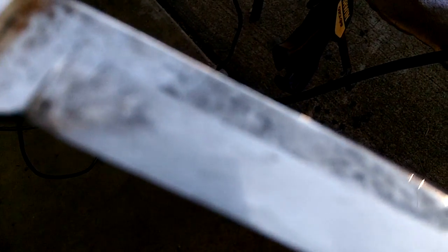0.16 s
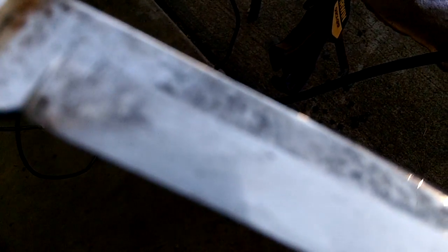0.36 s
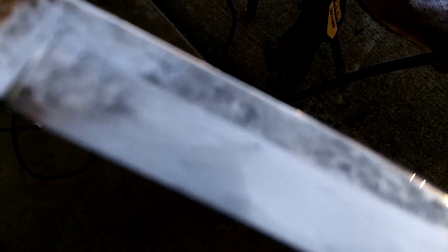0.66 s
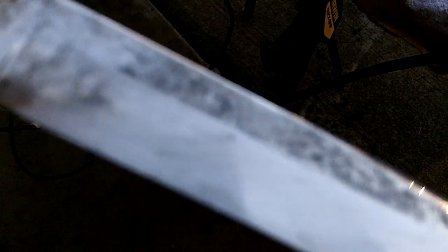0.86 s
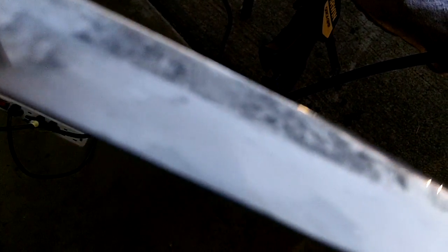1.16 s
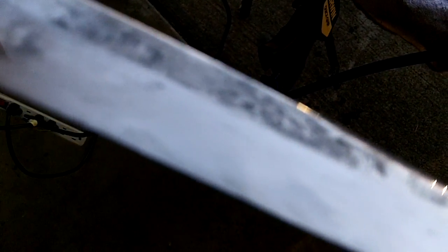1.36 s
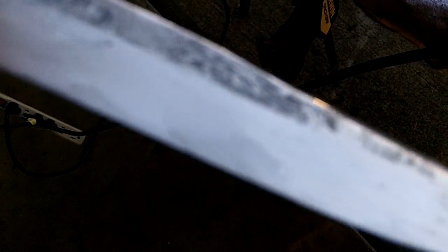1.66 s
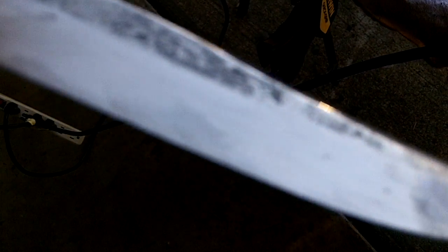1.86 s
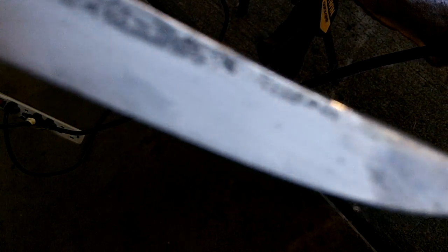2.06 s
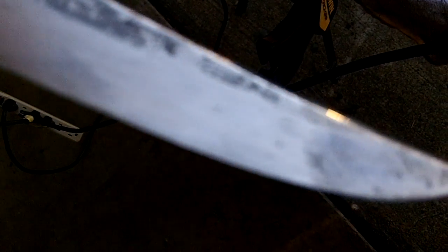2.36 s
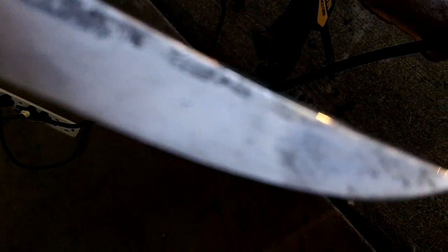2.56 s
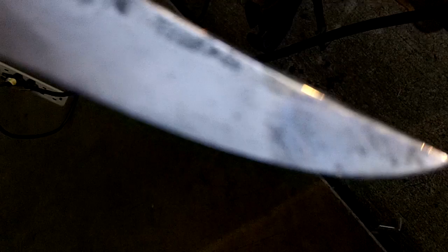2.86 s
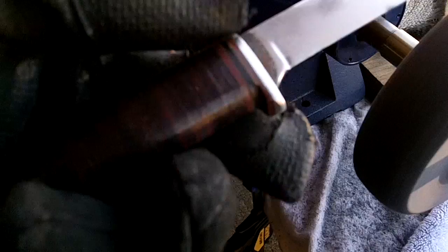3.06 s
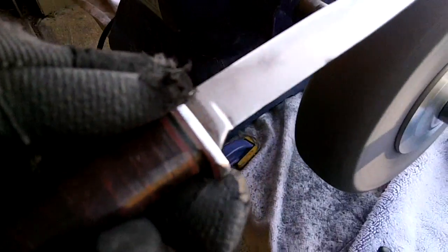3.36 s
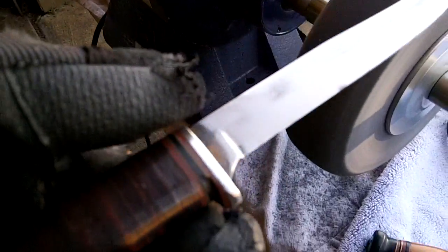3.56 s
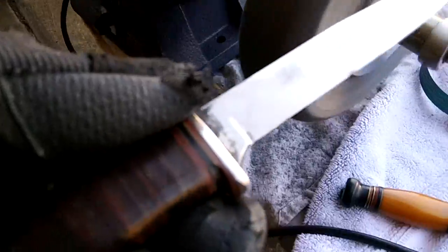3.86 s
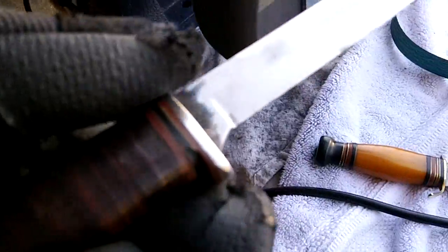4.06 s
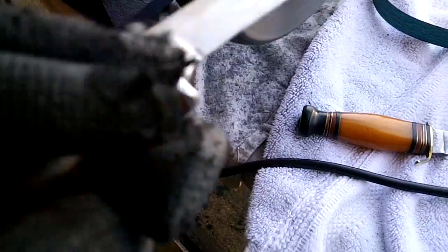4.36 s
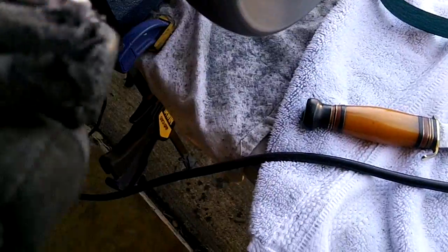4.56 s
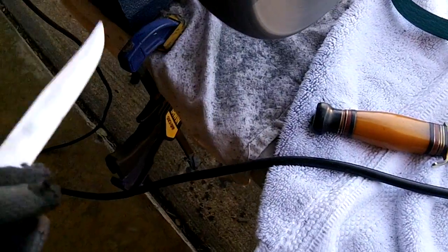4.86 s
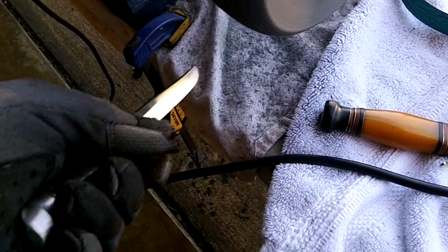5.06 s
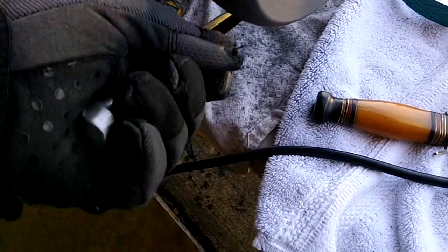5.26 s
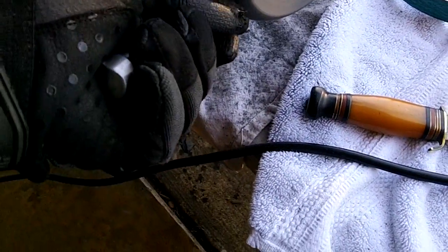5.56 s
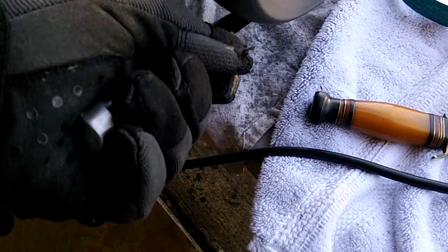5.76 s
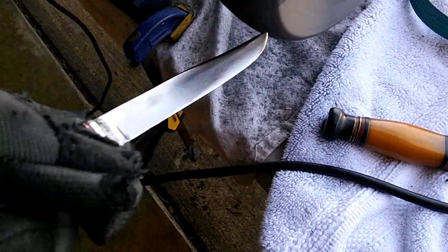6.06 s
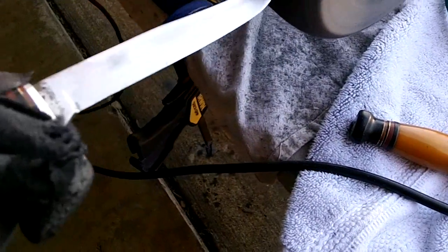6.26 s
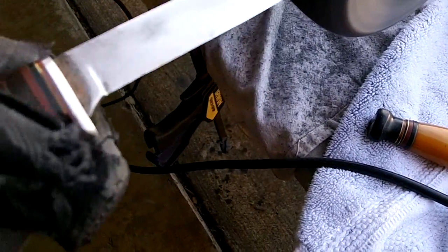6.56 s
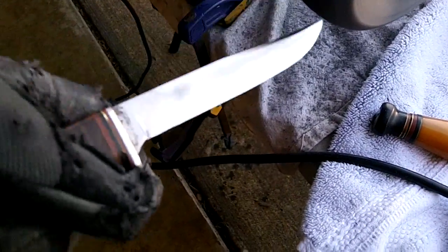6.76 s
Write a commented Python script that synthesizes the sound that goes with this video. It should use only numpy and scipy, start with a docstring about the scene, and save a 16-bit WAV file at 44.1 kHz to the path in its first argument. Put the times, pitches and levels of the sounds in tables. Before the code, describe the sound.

Quiet rising bird calls and a click give way to a steadily whining buffer motor, with one short, harsh stroke of steel on the wheel.

```python
"""Outdoors, a bird flicks out rising calls over far twitter, traffic and a faint rumble. A gloved hand
rustles on a knife, and a button click rings the camera's plastic shell. After a short silent cut a
bench buffer is running: shaft tones, magnetic hum and whine, air dragged by the wheel and a bearing
that squeals once, while the bird calls a little longer. Then the hand shades the motor and draws the
blade along the abrasive wheel to its tip, rasping on the high spots of each turn, and lifts it off."""
import sys
import numpy as np
from scipy import signal
from scipy.fft import rfft, irfft, next_fast_len
from scipy.io import wavfile
from scipy.ndimage import uniform_filter1d, map_coordinates

SR = 44100
rng = np.random.default_rng(int(sys.argv[2]) if len(sys.argv) > 2 else 0)


def wav_out(sig):
    """Save sig, one row per channel (or a flat mono array), as 16-bit PCM at SR to the path in sys.argv[1]."""
    wavfile.write(sys.argv[1], SR, np.round(np.clip(np.atleast_2d(sig).T, -1, 1) * 32767).astype(np.int16))


N = 304907
T = np.arange(N) / SR
CUT_START_S, CUT_END_S = 3.079, 3.148
MAINS_HZ, FREE_TURNS_PER_S = 60, 29.862
TOUCH_S, TIP_S, LIFT_S, CLEAR_S = 5.377, 6.0, 6.11, 6.155  # cues of the blade's stroke
MAGNETIC_SHADE_DB = -8.5  # how far the hand ducks the upper hum and the whine's sidebands

# Table levels are relative: each layer adds its own trims and envelopes.
# blade's bending modes (mid-blade pitch [Hz], tip pitch [Hz], width [Hz], mid level [dB], tip level [dB])
BLADE_MODES = [(920, 910, 56, -9.5, -7), (1764, 1562, 66, 8, 9), (2132, 2560, 85, 9.5, -3),
               (2404, 2630, 250, 0.5, 4.5), (3480, 3380, 265, -10.5, 7.5), (4570, 4640, 160, -33, 1),
               (5960, 5600, 110, -46, 0.5)]
# grit scraping on steel (frequency [Hz], level [dB])
GRIT_EQ = [(200, -24), (700, -7), (1300, 0), (2200, 3), (3000, 0.5), (4200, -0.5), (5000, -11), (5600, -28),
           (6800, -37), (7600, -48.5), (11000, -29.5), (13000, -64)]
# sizzle of the thin tip (frequency [Hz], level [dB])
SIZZLE_EQ = [(4000, -20), (7000, -8), (9000, 12), (11000, 7), (13500, -5), (15000, -16)]
# high spots on the wheel's rim (position [turns], width [turns], level [dB])
HIGH_SPOTS = [(.97, .05, 0), (.3, .06, -4), (.5, .04, -2), (.78, .06, -3)]
# the edge catches on the wheel (time [s], gain [dB])
EDGE_BITES = [(5.488, -1), (5.519, 7.5), (6.004, 7), (6.037, 6), (6.073, 5.5), (6.104, 3)]
# the hand's effort (time [s], pressure [dB], harshness [dB])
HAND_EFFORT = [(5.39, -34, -3.5), (5.396, -34, -5), (5.458, -30, -6), (5.616, -34.5, 2.5),
               (5.726, -33, 2.5), (5.812, -36.5, -7.5), (5.918, -37.5, -12), (6.03, -33.5, -0.5),
               (6.11, -35.5, 1)]
# tones of unbalance and bearings (shaft order [number], level [dB])
SHAFT_ORDERS = [(1, -50.5), (2, -57), (3, -50.5), (4, -72), (6, -57), (8, -57.5), (10, -55), (11, -55),
                (13, -58.5), (15, -54.5), (16, -62), (19, -62.5), (21, -59.5), (23, -64.5), (26, -62),
                (31, -66), (35, -86)]
# fader ride of the fifth shaft order (time [s], level [dB])
FIFTH_RIDE = [(3.2, -57), (3.73, -47.5), (4.53, -66), (4.88, -50.5), (5.34, -48), (5.69, -62.5),
              (6.19, -48), (6.9, -63.5)]
# fader ride of the low hum (time [s], level [dB])
LOW_HUM_RIDE = [(3.2, -47), (3.59, -47), (4.08, -53), (4.58, -44.5), (5.09, -46.5), (5.44, -52.5),
                (6.7, -58.5)]
# upper magnetic hum (frequency [multiples of the mains], level [dB])
HUM_PARTIALS = [(4, -60), (6, -58.5), (7, -57), (10, -54)]
# rotor bar whine and its sidebands (offset [multiples of the mains], level [dB])
WHINE_PARTIALS = [(-4, -57), (-2, -46.5), (0, -44), (4, -54.5), (8, -61.5), (10, -55.5), (12, -58),
                  (14, -75.5), (25, -63)]
# air dragged round by the wheel (frequency [Hz], level [dB])
RUSH_EQ = [(20, 19), (70, -5.5), (190, 7), (330, 0), (560, 3), (870, 0.5), (1100, -2.5), (2000, -2),
           (2750, -2), (3150, 0.5), (3900, -7.5), (4450, -7), (5000, -13), (7200, -22.5), (9000, -27.5),
           (14500, -32.5)]
# near bird's calls (time of the top [s], lead-in [s], knee pitch [Hz], top pitch [Hz], level [dB])
BIRD_CALLS = [(.763, 0.16, 2870, 3580, -67), (1.417, 0.22, 2900, 3550, -62.5),
              (1.893, 0.095, 2250, 3680, -61), (2.247, 0.086, 2280, 3750, -63),
              (2.592, 0.08, 2280, 3720, -59), (2.852, 0.093, 2350, 3610, -60),
              (3.118, .097, 2320, 3650, -59), (3.735, .078, 2300, 3700, -53),
              (4.24, 0.084, 2250, 3650, -50)]
# slapback off the walls (delay [s], level [dB])
WALL_ECHOES = [(.019, -9.5), (.043, -13), (.085, -25), (.13, -27)]
# handling and button clicks (time [s], peak level [dB], contact time [s])
CAMERA_CLICKS = [(2.681, -60, .004), (2.953, -31, 0.00071), (2.957, -20, 0.0008), (2.983, -49, .002)]
# modes of the camera's shell (pitch [Hz], level [dB], decay by 60 dB [s])
SHELL_MODES = [(170, -6, 0.015), (900, -12, 0.028), (1440, -8.5, 0.011), (2110, -3, 0.0033),
               (2920, -1, 0.011), (3150, 6, 0.0055), (4180, -3.5, 0.013), (5800, -29, .006)]
# the glove slides on the knife (peak time [s], build-up [s], level [dB])
GLOVE_SLIDES = [(1.98, .09, -74), (2.5, 0.42, -73), (2.61, 0.069, -65.5), (2.685, 0.048, -62.5),
                (2.935, 0.12, -64.5), (3.03, 0.073, -73)]
# the glove's rustle (frequency [Hz], level [dB])
GLOVE_EQ = [(1200, -19), (2300, -11), (3100, -0.5), (3900, -11), (5500, -15.5), (7000, -30), (10000, -41)]
# the hand jogs the camera (time [s], length [s], level [dB])
CAMERA_JOGS = [(0.377, 0.13, -61), (1.735, 0.25, -54), (2.05, 0.33, -56.5), (2.55, 0.54, -62),
               (2.977, 0.13, -54)]
# rumble of those jogs (frequency [Hz], level [dB])
JOG_EQ = [(10, -9), (25, 0.5), (50, -3.5), (90, -15.5), (200, -26.5), (800, -66)]
# a farther bird's falling chips (time [s], start pitch [Hz], level [dB])
FAR_CHIPS = [(.05, 3150, -71), (.105, 3200, -67), (1.375, 4250, -71), (1.43, 4250, -75), (1.6, 4700, -76),
             (1.72, 3850, -74), (1.95, 4500, -73), (2.04, 3400, -70), (2.11, 3050, -69.5)]
# distant vehicles (time [s], length [s], roar pitch [Hz], roar level [dB], tyre level [dB])
PASS_BYS = [(.8, 1, 520, -67, -75.5), (2.055, 0.67, 450, -68.5, -69), (2.85, 0.78, 545, -72, -69.5)]
# a far engine's two beating tones (pitch [Hz], level [dB])
ENGINE_TONES = [(52.4, -64.5), (70, -61.5)]
# outdoor air (frequency [Hz], level [dB])
AIR_EQ = [(12, -33), (22, 2), (64, -17.5), (110, -13.5), (190, -17), (300, -26.5), (450, -28), (700, -32),
          (1400, -33.5), (2050, -33.5), (2500, -36.5), (3200, -37.5), (4300, -39.5), (7500, -47),
          (15000, -43)]
# treble notches on the whole mix (centre [Hz], width [Hz])
TREBLE_NOTCHES = [(8020, 930), (11880, 150)]


def grinding(turns, travel=.096, bite_s=.0043, grit_db=-8):
    """Grit strikes the steel hardest on the rim's high spots as the contact slides toward the tip."""
    pressure_db, harsh_db = curves(HAND_EFFORT)
    on_tip = ramp(TIP_S, .029)
    place = travel * ramp(TOUCH_S, TIP_S - TOUCH_S) + (1 - travel) * on_tip  # mid-blade 0, tip 1
    held = 1 - ramp(LIFT_S, .012)
    contact = held * (.58 - .13 * place ** 2)  # the springy tip presses less between high spots
    for at, width, db in HIGH_SPOTS:
        distance = (turns - at + .5) % 1 - .5
        contact += gain_of(db) * np.exp(-(distance / width) ** 2 / 2)
    contact *= gain_of(sum(db * swell(s, bite_s) for s, db in EDGE_BITES))
    strikes = (noise() + .5 * per_turn(turns)) * contact * gain_of(1.5 * wander(900))
    rasp = unit_rms(blade_ring(strikes, place) + gain_of(grit_db) * coloured(noise() * contact, GRIT_EQ))
    # the rasp's harsh upper band swells and fades along the harshness curve
    harsh = signal.sosfiltfilt(butter(2, [2750, 5300], "band"), rasp)
    rasp += (gain_of(harsh_db + 5.5 - 5 * on_tip) - 1) * harsh
    groan = (1 - on_tip) * wheel_groan()
    sizzle = coloured(noise() * np.sqrt(abs(contact)), SIZZLE_EQ)
    sizzle *= gain_of(-56) * on_tip * ramp(TIP_S, .07) ** 2
    attack = ramp(TOUCH_S, .0027)
    release = gain_of(-250 * np.maximum(T - LIFT_S, 0)) * (T < CLEAR_S)
    return attack * release * (gain_of(pressure_db + 1.58) * rasp + groan + sizzle)


def blade_ring(strikes, place):
    """The steel's bending modes shift in pitch and level as the contact nears the tip."""
    stroke = ramp(TOUCH_S, LIFT_S - TOUCH_S)
    ring = np.zeros(N)
    for k, (mid_hz, tip_hz, width, mid_db, tip_db) in enumerate(BLADE_MODES):
        shift = stroke if k < 2 else place  # the lowest modes sink evenly through the stroke
        mode = resonate(strikes, mid_hz + (tip_hz - mid_hz) * shift, width)
        ring += gain_of(mid_db + (tip_db - mid_db) * shift) * mode
    return unit_rms(signal.sosfilt(butter(5, [700, 6600], "band"), ring))


def wheel_groan(start_s=5.745, fade_db_per_s=20):
    """The wheel groans where the blade's curve digs in."""
    envelope = ramp(start_s, .038) * gain_of(-47 - fade_db_per_s * (T - start_s))
    return envelope * whistle(hz=620, width_hz=85)


def shaft_turns(sag_turns_per_s=.1, sag_s=.16, zero_at_s=6.0375):
    """The wheel's angle in turns; the blade's load slows it a little."""
    load = ramp(TOUCH_S, sag_s) - ramp(TIP_S, sag_s)
    turns = np.cumsum(FREE_TURNS_PER_S - sag_turns_per_s * load) / SR
    return turns - turns[round(zero_at_s * SR)]


def shaft_tones(turns):
    """Unbalance and bearings give the motor its body: harmonics of the shaft's speed."""
    orders, levels = np.transpose(SHAFT_ORDERS)
    shade_db = -7 * hand_shade()
    out = np.zeros(N)
    for k in range(1, 36):
        shade_share = .13 if k < 5 else 1  # long waves bend round the hand
        db = np.interp(k, orders, levels) - 1.8 + shade_share * shade_db
        if k == 5:
            db = curves(FIFTH_RIDE)[0] - 1
        # the low orders line up into one soft thump as the high spot comes round
        out += tone(k * (turns - HIGH_SPOTS[0][0]), db, waver=.22, phase_spread=min(k / 20, 1))
    return out


def mains_hum(waver=.042):
    """The magnetic pull hums at twice the mains and at higher multiples."""
    out = tone(2 * MAINS_HZ * T, curves(LOW_HUM_RIDE)[0], waver)
    for k, db in HUM_PARTIALS:
        out += tone(k * MAINS_HZ * T, db - 2 + MAGNETIC_SHADE_DB * hand_shade(), waver)
    return out


def rotor_whine(turns, bars=22):
    """The passing rotor bars whine, with sidebands spaced by the mains."""
    out = np.zeros(N)
    for k, db in WHINE_PARTIALS:
        shade_db = MAGNETIC_SHADE_DB * hand_shade() * (1 if k else .71)
        out += tone(bars * turns + k * MAINS_HZ * T, db - 2.5 + shade_db, waver=.042)
    return out


def air_rush(turns, level_db=-43, throb_db=.6, buzz_db=1):
    """Dragged air and bearing hiss, throbbing once a turn and buzzing with the magnetic pull."""
    pulse_db = throb_db * np.cos(2 * np.pi * turns) + buzz_db * np.cos(2 * np.pi * 2 * MAINS_HZ * T)
    hiss = signal.sosfilt(butter(4, 950, "high"), per_turn(turns))
    air = coloured(noise() + .57 * hiss, RUSH_EQ)
    bass = signal.sosfiltfilt(butter(2, 330), air)
    shade_db = -8.5 * hand_shade()
    shaded = gain_of(.6 * shade_db) * bass + gain_of(shade_db) * (air - bass)
    return gain_of(level_db + pulse_db + wander(200)) * shaded


def bearing(rest_hz=3138, squeal_rise_hz=543):
    """The bearing sings two fuzzy whistles; once, the lower creeps up, holds and drops back."""
    squeal = ramp(3.35, .137) - ramp(3.59, .015)
    hz = (rest_hz + squeal_rise_hz * squeal) * (1 + .012 * wander(45))
    lower_gain, upper_gain = gain_of(2.4 * wander(55)), gain_of(-6 + 2 * wander(45))
    song = lower_gain * whistle(hz, width_hz=135) + upper_gain * whistle(4430, width_hz=160)
    return gain_of(-56.5 + 2.5 * squeal - 11 * hand_shade()) * song


def hand_shade():
    """How far the hand covers the motor and ducks its sounds, 0 to 1."""
    return ramp(5.34, .3)


def near_bird(flutter=.27, thin_at_s=1.068, thin_s=.17):
    """Fluttering calls and one thin whistle that sags and turns up, thrown back by the walls."""
    song = np.zeros(N)
    for top_s, lead_s, knee_hz, top_hz, db in BIRD_CALLS:
        add(song, top_s - lead_s, bird_call(lead_s, knee_hz, top_hz, db))
    bend = abs((progress(thin_s) - .36) / .64) ** 3
    add(song, thin_at_s, note(5910 + 1100 * bend, db=-71.5, fade_share=.73))
    song *= (1 + flutter * wander(150)) * gain_of(wander(40))
    out = song.copy()
    for delay, db in WALL_ECHOES:
        add(out, delay, gain_of(db) * song)
    return out + reverb(song, t60=.6, wet_db=-13)


def bird_call(lead_s, knee_hz, top_hz, db, start_hz=1880, flick_s=.023, droop_hz=450):
    """A soft creep up to the knee, a brief voice break, a loud flick to the top, a short droop."""
    droop_s = .226 * lead_s
    t = np.arange(-lead_s, droop_s, 1 / SR)
    creep = np.clip((t + lead_s) / (lead_s - flick_s), 0, 1) ** 1.9
    flick = np.sin(np.pi / 2 * np.clip(1 + t / flick_s, 0, 1))
    droop = np.clip(t / droop_s, 0, 1)
    hz = start_hz + (knee_hz - start_hz) * creep + (top_hz - knee_hz) * flick - droop_hz * droop
    effort = np.clip((hz - start_hz) / (top_hz - droop_hz - start_hz), 0, 1)  # higher is louder
    voice_break = np.exp(-((t / lead_s + .34) / .097) ** 2)
    return note(hz, db - 8.5 * (1 - effort) - 11 * voice_break, fade_share=.14)


def camera_clicks(scuff=.14):
    """Short, scuffed contacts ring the camera's plastic shell."""
    t = np.arange(2000) / SR
    ring = sum(gain_of(db - 60 * t / t60) * np.sin(2 * np.pi * hz * t) for hz, db, t60 in SHELL_MODES)
    out = np.zeros(N)
    for s, db, contact_s in CAMERA_CLICKS:
        push = (t == 0) + scuff * rng.standard_normal(len(t)) * np.exp(-t / contact_s)
        click = signal.sosfilt(butter(4, 6000), signal.fftconvolve(push, ring))
        add(out, s, gain_of(db) * click / abs(click).max())
    return out


def glove(grain_db=2.5, stop_s=.022):
    """Grainy friction of the glove on the knife; each slide builds up and stops short."""
    rub = np.zeros(N)
    for s, build_s, db in GLOVE_SLIDES:
        rub += gain_of(db) * np.exp(-((T - s) / np.where(T < s, build_s, stop_s)) ** 2)
    return rub * gain_of(grain_db * wander(160)) * coloured(noise(), GLOVE_EQ)


def camera_jogs():
    """Dull swells of rumble as the hand jogs the camera."""
    envelope = sum(gain_of(db) * swell(s, length) for s, length, db in CAMERA_JOGS)
    return envelope * coloured(noise(), JOG_EQ)


def far_birds(chip_s=.038, twitter_s=.08, twitters=30, low_hz=2030, high_hz=4700):
    """Falling chips and random twitter, half lost in their own echo."""
    song = np.zeros(N)
    for s, hz, db in FAR_CHIPS:
        add(song, s, note(hz * (1 - .18 * progress(chip_s)), db, fade_share=.46))
    for when, height in rng.random((twitters, 2)):
        hz = low_hz + height * (high_hz - low_hz)
        add(song, when * CUT_START_S, note(hz * (1 - .07 * progress(twitter_s)), db=-81, fade_share=1))
    return gain_of(-2) * song + reverb(song, t60=.5, wet_db=-3)


def traffic(roar_width_hz=170):
    """Distant vehicles swell past, each a low roar and a band of tyre noise."""
    tyres = whistle(856, width_hz=154)
    out = np.zeros(N)
    for s, length, hz, roar_db, tyre_db in PASS_BYS:
        roar = whistle(hz, roar_width_hz) + gain_of(-12) * whistle(2.41 * hz, roar_width_hz)
        out += swell(s, length) * (gain_of(roar_db) * roar + gain_of(tyre_db) * tyres)
    return out


def outdoor_bed(growth_db_per_s=1):
    """Still air, with the town's low note and a far engine's drone slowly growing."""
    growth_db = growth_db_per_s * T
    air = gain_of(-61) * coloured(noise(), AIR_EQ)
    town = gain_of(-73 + growth_db) * whistle(213, width_hz=49)
    engine = sum(tone(hz * T, db - 1.9 + growth_db, waver=.25) for hz, db in ENGINE_TONES)
    return air + town + engine


def reverb(x, t60, wet_db):
    """The diffuse tail from trees and walls."""
    t = np.arange(SR // 2) / SR
    tail = rng.standard_normal(len(t)) * gain_of(-60 * t / t60)
    return gain_of(wet_db) * signal.fftconvolve(x, tail / np.linalg.norm(tail))[:N]


def per_turn(turns, slip_turns=.00064):
    """A rough surface that comes round again each turn, slipping a little."""
    surface = rng.standard_normal(round(SR / FREE_TURNS_PER_S))
    angle = (turns + slip_turns * wander(25)) % 1
    return unit_rms(map_coordinates(surface, [angle * len(surface)], order=3, mode="wrap"))


def tone(cycles, db, waver, phase_spread=1):
    """One partial, wavering a little in level and phase."""
    start = phase_spread * (rng.random() - .5)
    amplitude = gain_of(db) * np.sqrt(2) * (1 + waver * wander(7))
    return amplitude * np.cos(2 * np.pi * (cycles + start) + waver * wander(7))


def note(hz, db, fade_share):
    """A pure gliding whistle that fades in and out."""
    envelope = gain_of(db) * signal.windows.tukey(len(hz), fade_share)
    return envelope * np.sin(2 * np.pi * np.cumsum(hz) / SR)


def whistle(hz, width_hz):
    """Noise held in a narrow resonance, at rms 1."""
    return unit_rms(resonate(resonate(noise(), hz, width_hz), hz, width_hz))


def resonate(x, hz, width_hz):
    """A resonance of gain 1 that may glide."""
    carrier = np.exp(2j * np.pi * np.cumsum(hz * np.ones(N)) / SR)
    pole = np.exp(-np.pi * width_hz / SR)
    return 2 * (carrier * signal.lfilter([1 - pole], [1, -pole], x / carrier + 1e-18)).real


def coloured(x, eq):
    """Shapes x with an EQ curve, at rms 1."""
    eq_hz, eq_db = np.transpose(eq)
    size = next_fast_len(N)
    hz = np.fft.rfftfreq(size, 1 / SR)
    response = gain_of(np.interp(np.log(hz + 1), np.log(eq_hz + 1), eq_db))
    return unit_rms(irfft(rfft(x, size) * response, size)[:N])


def butter(order, hz, kind="low"):
    """A filter with a flat passband."""
    return signal.butter(order, hz, kind, fs=SR, output="sos")


def noise():
    """White noise."""
    return rng.standard_normal(N)


def wander(per_s):
    """Random modulation, at rms 1."""
    knots = rng.standard_normal(8000)
    return unit_rms(np.interp(T * per_s, np.arange(len(knots)), knots))


def curves(rows):
    """An automation curve for each value column of a timed table."""
    times, *columns = np.transpose(rows)
    return [np.interp(T, times, column) for column in columns]


def swell(s, length):
    """A bell-shaped rise and fall around time s."""
    return np.exp(-(2 * (T - s) / length) ** 2)


def ramp(s, length):
    """Rises evenly from 0 at time s to 1 over the given length."""
    return np.clip((T - s) / length, 0, 1)


def progress(length_s):
    """Runs from 0 to 1 over one note."""
    return np.linspace(0, 1, round(length_s * SR))


def add(mix, s, sound):
    """Mixes a sound in at time s."""
    part = mix[round(s * SR):][:len(sound)]
    part += sound[:len(part)]


def gain_of(db):
    """Decibels to amplitude."""
    return 10 ** (np.asarray(db) / 20)


def unit_rms(x):
    """Scales to rms 1."""
    return x / np.sqrt(np.mean(x ** 2) + 1e-20)


def scene():
    """The quiet yard, a silent cut, then the buffer at work; birdsong bridges the two."""
    before = uniform_filter1d(1. * (T < CUT_START_S), size=100)
    after = uniform_filter1d(1. * (T > CUT_END_S), size=250)
    turns = shaft_turns()
    motor = shaft_tones(turns) + mains_hum() + rotor_whine(turns)
    buffer = motor + air_rush(turns) + bearing() + grinding(turns)
    yard = outdoor_bed() + traffic() + camera_jogs() + glove() + camera_clicks()
    birds = near_bird() + far_birds()
    return (before * yard + after * buffer + (before + after) * birds)[None]


def record(dry, high_cut_hz=15000, notch_db=-30):
    """Master EQ: two narrow treble notches and a steep high cut."""
    hz = np.fft.rfftfreq(N, 1 / SR)
    response = 1 / (1 + (hz / high_cut_hz) ** 200)
    for centre, width in TREBLE_NOTCHES:
        response *= gain_of(notch_db * np.exp(-(2 * (hz - centre) / width) ** 2))
    return irfft(rfft(dry) * response, N)


dry = scene()
out = record(dry)
wav_out(out)
```